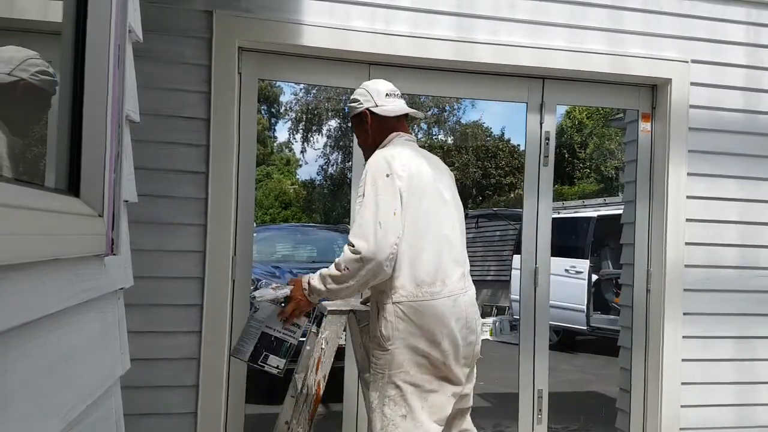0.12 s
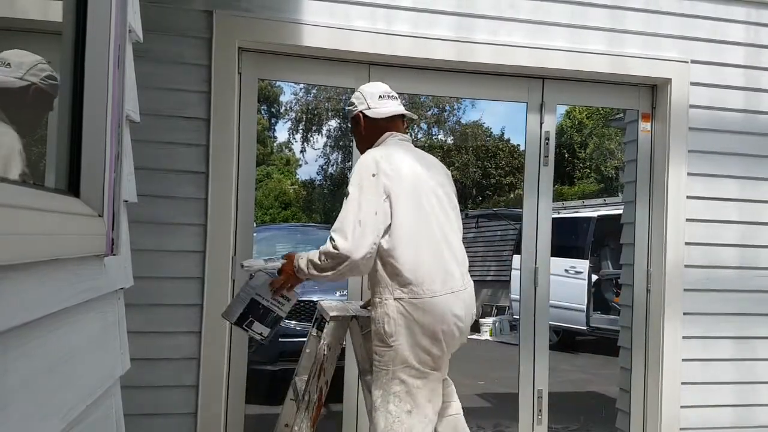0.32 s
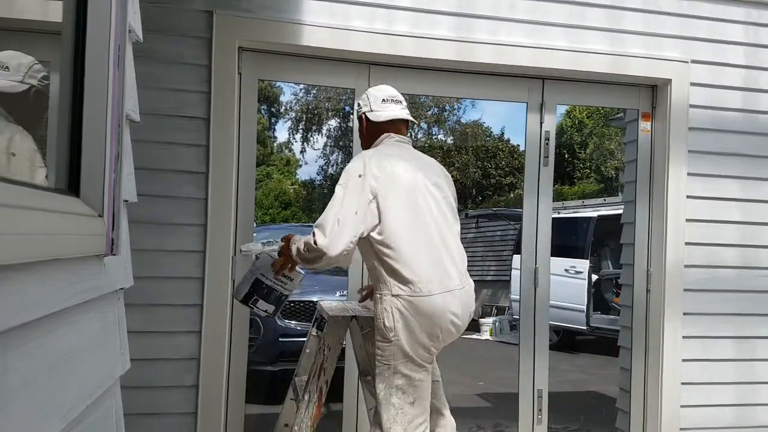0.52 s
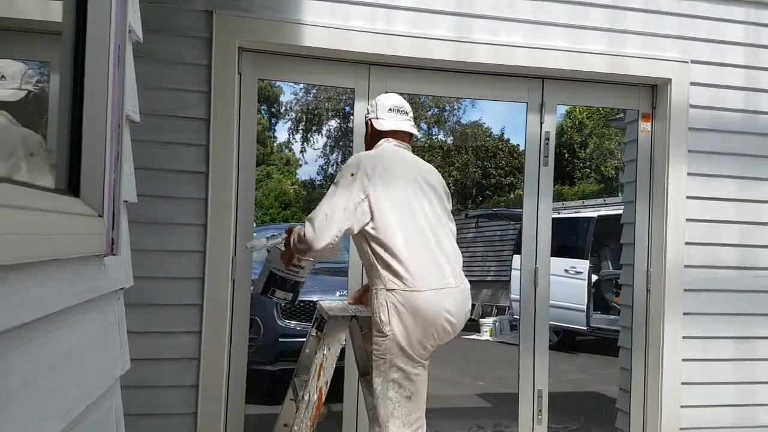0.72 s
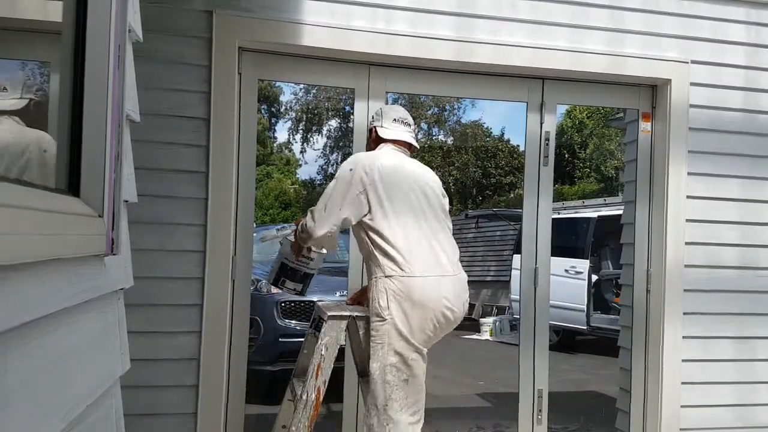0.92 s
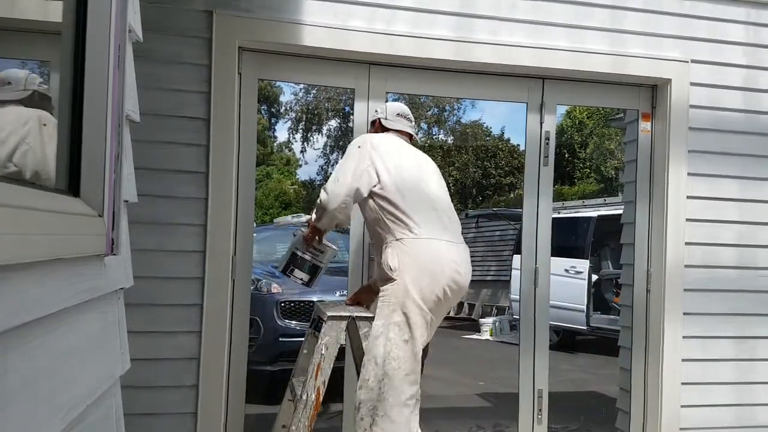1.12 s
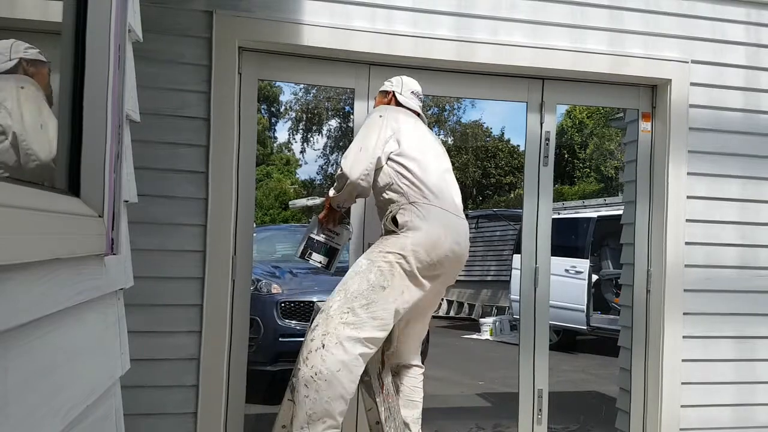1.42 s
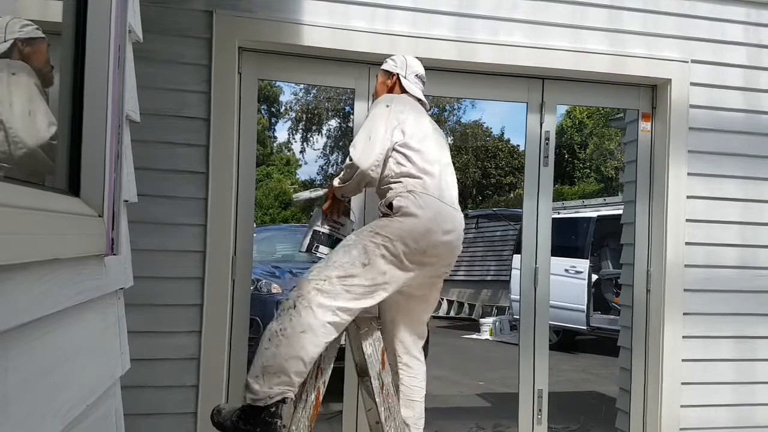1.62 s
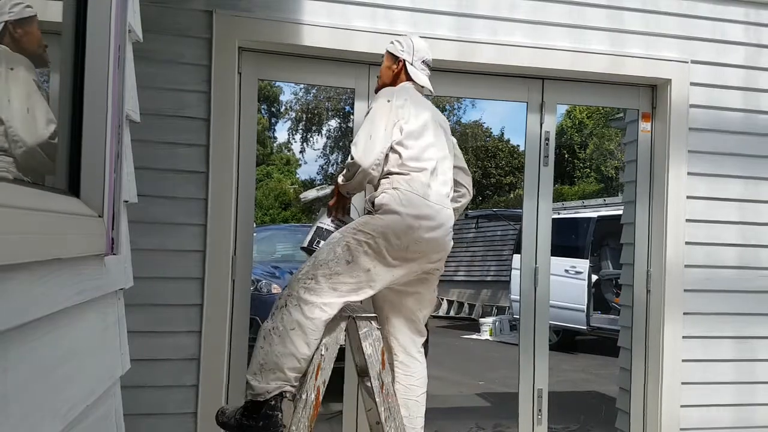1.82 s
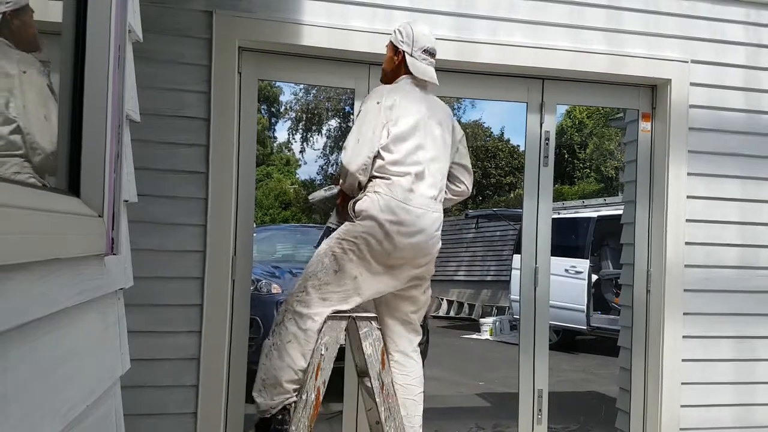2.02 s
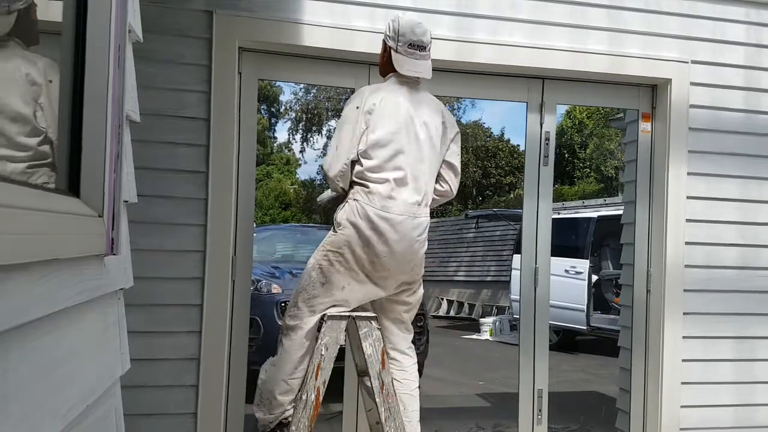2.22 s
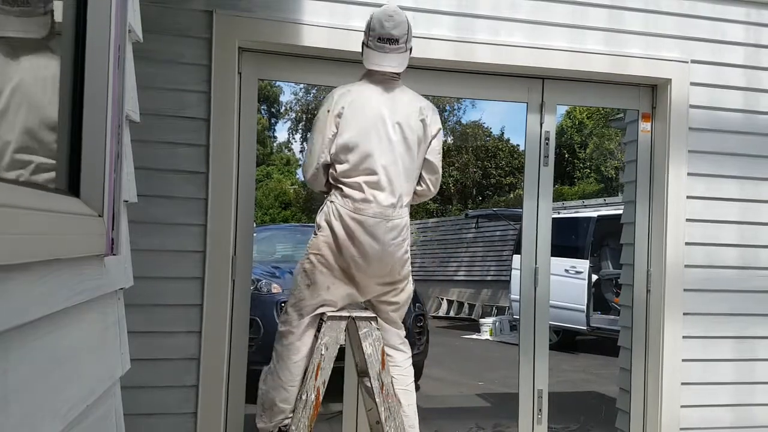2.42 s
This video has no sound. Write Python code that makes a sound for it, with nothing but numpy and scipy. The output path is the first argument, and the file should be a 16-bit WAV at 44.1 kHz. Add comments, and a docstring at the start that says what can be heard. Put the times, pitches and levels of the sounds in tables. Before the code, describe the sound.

A stepladder is set down with one sharp knock that rings and echoes off nearby house walls. Lighter knocks, faint cloth rustles and soft footfalls follow, then a rising, squeaky scrape. Distant traffic hums quietly outdoors.

```python
"""Stepladder set down beside a house

The ladder lands hard: its frame rings and hard walls echo for most of a second.
Lighter knocks, cloth rustles and soft footfalls follow, then a rising scrape with stick-slip squeaks.
Far traffic and air hum quietly underneath; the two microphone ports differ, mostly in the treble."""
import sys
import numpy as np
from scipy import signal
from scipy.fft import rfft, irfft
from scipy.io import wavfile
from scipy.ndimage import uniform_filter1d

SR = 44100
rng = np.random.default_rng(int(sys.argv[2]) if len(sys.argv) > 2 else 0)


def unload_audio(sound):
    """Save the sound as a 16-bit wav file, at the path given as the first command line argument."""
    columns = np.transpose(np.atleast_2d(sound))
    # keep every value between -1 and 1, then stretch to whole-number steps
    steps = np.round(np.clip(columns, -1, 1) * 32767)
    wavfile.write(sys.argv[1], SR, steps.astype(np.int16))


N = 114660

# left-right likeness of the sound field: f/Hz, correlation
COHERENCE = [(60, .95), (130, .96), (290, .86), (500, .62), (900, .2), (1410, .1), (3100, .06), (6820, 0.0),
             (15000, 0.0)]


def from_db(db):
    """Decibels to gain."""
    return 10 ** (np.asarray(db) / 20)


def unit_rms(x):
    """Scale to rms 1."""
    return x / np.sqrt(np.mean(x ** 2) + 1e-20)


def at_hz(points, hz):
    """Read a table on a log-frequency axis."""
    freqs_hz, values = np.transpose(points)
    return np.interp(np.log(hz), np.log(freqs_hz), values)


def stereo_band(white, edges_hz, hz):
    """Band-pass two noises and mix as mid and side: alike in the bass, unrelated in the treble."""
    mid, side = signal.sosfilt(signal.butter(2, edges_hz, "band", fs=SR, output="sos"), white)
    alike = np.clip(at_hz(COHERENCE, hz), -0.99, 0.99)
    return np.sqrt(1 + alike) * mid + np.sqrt(1 - alike) * side * [[1], [-1]]


def noise_bands(size):
    """Yield centre frequency and stereo noise for each third octave."""
    edges_hz = 36 * 2 ** np.arange(0, 9.1, 1 / 3)
    white = rng.standard_normal((2, 2, size))
    for k, (low_hz, high_hz) in enumerate(zip(edges_hz, edges_hz[1:])):
        hz = np.sqrt(low_hz * high_hz)
        yield hz, stereo_band(white[k % 2], [low_hz, high_hz], hz)


def burst(start_s, length_s, db, hz, width_oct):
    """A short swell of stereo noise around a pitch."""
    start, size = int(start_s * SR), int(length_s * SR)
    edges_hz = hz * 2 ** (np.array([-0.5, 0.5]) * width_oct)
    noise = stereo_band(rng.standard_normal((2, SR // 2)), edges_hz, hz)[:, -size:]
    swell = np.sqrt(np.sin(np.pi * np.arange(size) / size))
    out = np.zeros((2, N + SR))
    out[:, start:start + size] = from_db(db) * unit_rms(noise) * swell
    return out[:, :N]


def hum(level_db=-56.5):
    """Far traffic and air: steady, bass-heavy noise."""
    spectrum = [(36, -3.5), (60, -4.5), (100, -7), (200, -11), (400, -14.5), (800, -19.5), (1600, -24),
                (3000, -30), (4800, -33), (6300, -26), (8500, -34), (12000, -40.5), (15500, -39)]  # f/Hz, relative density/dB
    air = sum(from_db(at_hz(spectrum, hz)) * noise[:, -N:] for hz, noise in noise_bands(N + SR // 4))
    return from_db(level_db) * unit_rms(air)


def frame_ring(build_s=0.0011):
    """Impulse response of the ladder frame: decaying modes."""
    modes = [(190.6, -11.5, 0.18), (294.4, -2.5, 0.39), (376.6, -1, 0.033), (449.9, 3.5, 0.42),
             (502, -2.5, .3), (627, -11.5, 0.86), (933, 0.5, .4), (1262, -11.5, 0.35), (1438, -9.5, .4),
             (1723, -7.5, 0.89), (1667, 3.5, 0.1), (1850, -6, 0.17), (2107, -8.5, 0.49), (3036, -6, .2),
             (3240, -8, 0.47)]  # f/Hz, relative level/dB, t60/s
    ring, t = np.zeros((2, SR)), np.arange(SR) / SR
    for hz, db, t60_s in modes:
        stereo_rad = np.arccos(at_hz(COHERENCE, hz)) * np.array([[0.5], [-0.5]])
        phase_rad = 2 * np.pi * hz * t + stereo_rad + rng.uniform(0, 2 * np.pi)
        ring += from_db(db - 60 * t / t60_s) * np.sin(phase_rad)
    return ring * (1 - np.exp(-t / build_s))


def ladder_knocks(echo_db=36, frame_db=-4):
    """Each contact shapes a click that echoes off the walls and rings the frame."""
    hits = [(0.076, -52.5, 305, 1030, 3), (0.2241, -26, 500, 7000, 5.5), (.232, -13, 102, 11600, -2),
            (.766, -53.5, 796, 2490, -20), (.774, -43.5, 252, 1480, -4.5), (.784, -42, 900, 9200, -22),
            (.794, -32, 59, 606, 2), (1.447, -49.5, 685, 2450, 3), (2.158, -45.5, 650, 3500, -0.5),
            (2.253, -48.5, 197, 1490, 0), (2.501, -48.5, 250, 1200, 0.5)]  # t/s, relative level/dB, low cut/Hz, high cut/Hz, ring offset/dB
    echo_colour = [(59, -48), (100, -23.5), (238, -19), (287, -10.5), (340, -23.5), (447, -2.5), (552, -10),
                   (936, -7.5), (1520, -8), (1800, -7.5), (3610, -12.5), (4100, -18.5), (6530, -21),
                   (9150, -31), (15500, -26.5)]  # f/Hz, relative density/dB
    to_walls, to_frame = np.zeros(N), np.zeros(N)
    for start_s, db, low_hz, high_hz, ring_db in hits:
        contact = signal.butter(1, [low_hz, high_hz], "band", fs=SR)
        click = signal.lfilter(*contact, signal.unit_impulse(SR // 20))
        start = int(start_s * SR)
        to_walls[start:start + len(click)] += from_db(db + echo_db) * click
        to_frame[start:start + len(click)] += from_db(db + ring_db + frame_db) * click
    echoes = wall_echoes(to_walls, echo_colour)
    return echoes + signal.fftconvolve(to_frame[None], frame_ring(), axes=1)[:, :N]


def wall_echoes(x, colour=((20, 0), (20000, 0)), build_s=0.0035, early_s=0.0082, early_db=-1):
    """Dense reflections build up, with a short early part and a tail dying band by band."""
    decay = [(100, .6), (200, .5), (340, 0.6), (500, 0.67), (1000, .7), (2000, 0.66), (3500, 0.76),
             (6000, 0.66), (11000, .45), (15000, 0.76)]  # f/Hz, t60/s
    t = np.arange(SR) / SR
    early = from_db(early_db) * np.exp(-t / early_s)
    response = np.zeros((2, SR))
    for hz, noise in noise_bands(SR):
        tail = from_db(-60 * t / at_hz(decay, hz))
        response += from_db(at_hz(colour, hz)) * noise * (early + tail)
    response = unit_rms(response * (1 - np.exp(-t / build_s))) / np.sqrt(SR)  # unit energy
    return signal.fftconvolve(x[None], response, axes=1)[:, :N]


def rustles():
    """Cloth and shoes: faint swells of noise."""
    swells = [(0.078, 0.26, -59.5, 1390, 1.53), (.9, 0.2, -60.5, 1210, 2.07),
              (1.391, 0.043, -57.5, 1620, 1.45), (1.447, 0.034, -56, 990, 0.43),
              (1.462, 0.068, -60.5, 3260, 0.99), (1.656, 0.077, -57.5, 1670, 2),
              (1.734, 0.22, -60.5, 1070, 1.9), (1.794, 0.094, -58, 3430, .7),
              (1.909, .05, -61.5, 2340, 0.97), (2.153, 0.037, -64, 6950, 1.9),
              (2.188, 0.059, -50.5, 1110, 0.99), (2.28, 0.052, -57.5, 930, 2.3)]  # t/s, length/s, level/dB, f/Hz, width/oct
    return sum(burst(*row) for row in swells)


def footfalls():
    """Low soft thuds."""
    thuds = [(1.692, -52.5, 184), (1.72, -52, 184), (1.798, -62.5, 200), (2.253, -43.5, 180),
             (2.266, -46.5, 260), (2.30, -58, 202), (2.326, -50, 200)]  # t/s, level/dB, f/Hz
    return sum(burst(start_s, length_s=0.02, db=db, hz=hz, width_oct=0.97) for start_s, db, hz in thuds)


def scrape(grain_s=0.0016, grain_db=0.5):
    """A drag: grainy hiss, with narrow squeaks where the surfaces stick and slip."""
    strength = [(2.311, -59), (2.327, -49), (2.36, -48), (2.42, -50.5), (2.47, -46), (2.498, -45),
                (2.53, -37.5), (2.56, -38.5), (2.586, -35), (2.6, -42)]  # t/s, level/dB
    colour = [(250, -18.5), (400, -14.5), (1000, -14.5), (2000, -14), (3200, -8.5), (5000, -9.5),
              (6500, -14), (7500, -15), (9000, -23), (10500, -22), (12300, -16.5), (15500, -19.5)]  # f/Hz, relative density/dB
    squeaks = [(2.318, .03, -44, 1660, 0.47), (2.355, 0.054, -50, 5840, 0.11),
               (2.399, 0.0262, -46.5, 1733, 0.062), (2.411, .045, -47, 2155, 0.24),
               (2.445, .04, -59, 1500, 0.12), (2.463, 0.027, -52, 3996, 0.12),
               (2.472, .03, -48.5, 3500, 0.11), (2.483, .03, -50, 4660, 0.068),
               (2.493, 0.041, -49, 4100, 0.054), (2.506, 0.029, -47, 3540, .2),
               (2.519, .07, -44.5, 2910, .1), (2.525, 0.039, -35.5, 2190, 0.073),
               (2.529, 0.059, -60, 4950, 0.089), (2.536, 0.041, -41.5, 2510, 0.067),
               (2.540, .05, -48, 1166, 0.12), (2.568, .04, -42, 3440, 0.31), (2.602, 0.046, -40, 2430, .1)]  # t/s, length/s, level/dB, f/Hz, width/oct
    drag_db = np.interp(np.arange(N) / SR, *np.transpose(strength), left=-120)
    grain = unit_rms(uniform_filter1d(rng.standard_normal(N), int(grain_s * SR)))
    hiss = unit_rms(sum(from_db(at_hz(colour, hz)) * noise for hz, noise in noise_bands(N)))
    return from_db(drag_db + grain_db * grain) * hiss + sum(burst(*row) for row in squeaks)


def mic_ports(x, share):
    """Apply a share of the colour difference between the two microphone ports."""
    imbalance = [(60, -1), (140, 0.5), (330, 1), (500, -2), (800, -4.5), (1200, -3), (2500, -2.5),
                 (4200, -4.5), (6400, -3.5), (7800, 12), (9000, 3), (10500, 17.5), (12500, 3.5), (15000, 3)]  # f/Hz, left minus right/dB
    hz = np.maximum(np.fft.rfftfreq(N, 1 / SR), 1)
    gain_db = share * at_hz(imbalance, hz) * np.array([[0.5], [-0.5]])
    return irfft(rfft(x) * from_db(gain_db), N)


def scene(step_echo_db=-2, cloth_echo_db=1, drag_echo_db=-4.5):
    """All sources and their echoes at the microphone ports."""
    steps, cloth, drag = footfalls(), rustles(), scrape()
    sent = from_db(step_echo_db) * steps + from_db(cloth_echo_db) * cloth + from_db(drag_echo_db) * drag
    echoes = wall_echoes(sent[0])
    foreground = ladder_knocks() + cloth + steps + drag + echoes
    return mic_ports(foreground, share=0.99) + mic_ports(hum(), share=0.7)


def record(dry):
    """Slight peak rounding, then a steep low-pass."""
    ceiling, cutoff_hz = 1.6, 15750
    lowpass = signal.ellip(12, 0.5, 80, cutoff_hz, fs=SR, output="sos")
    return signal.sosfilt(lowpass, ceiling * np.tanh(dry / ceiling))


dry = scene()
out = record(dry)
unload_audio(out)
```